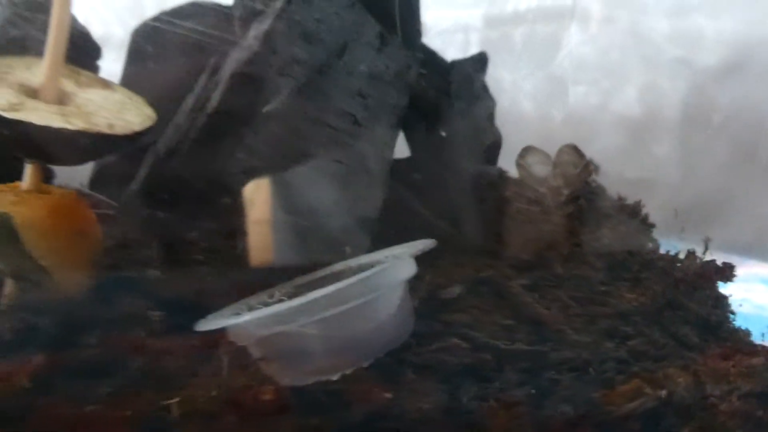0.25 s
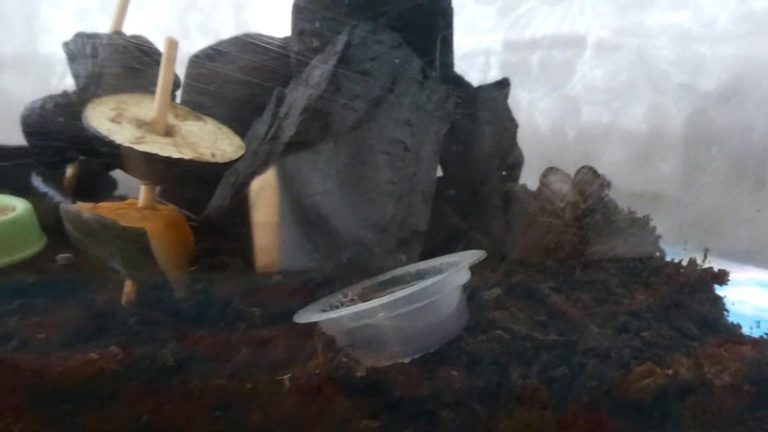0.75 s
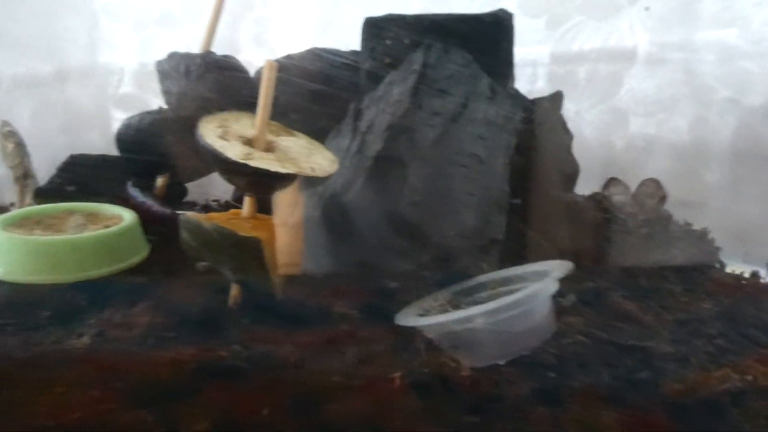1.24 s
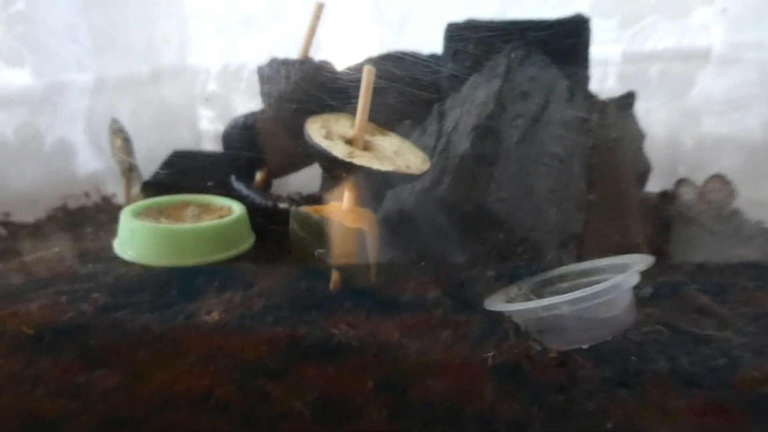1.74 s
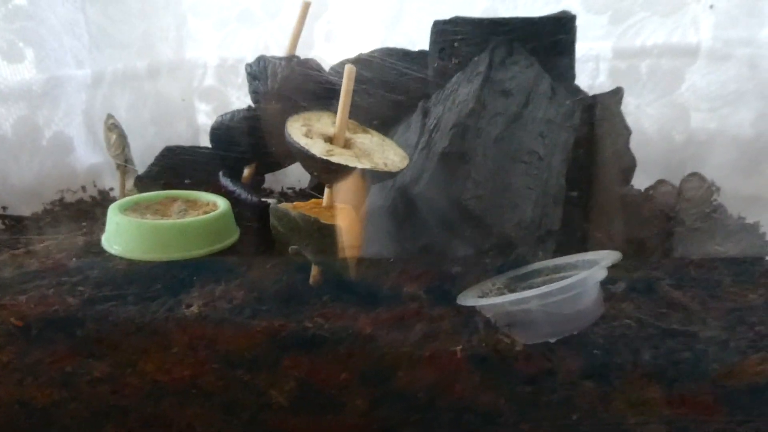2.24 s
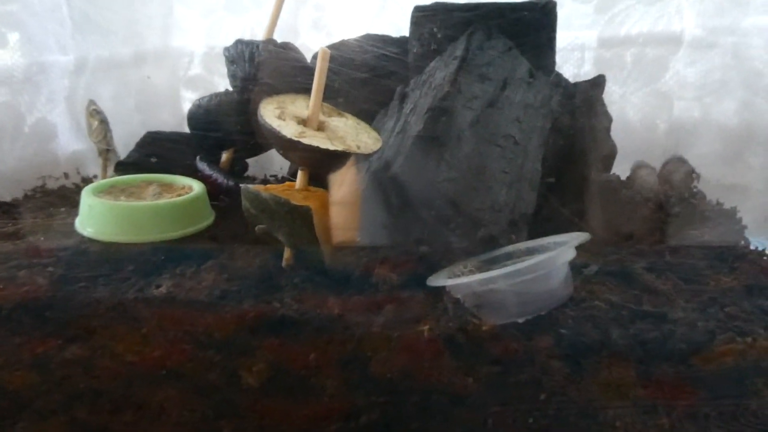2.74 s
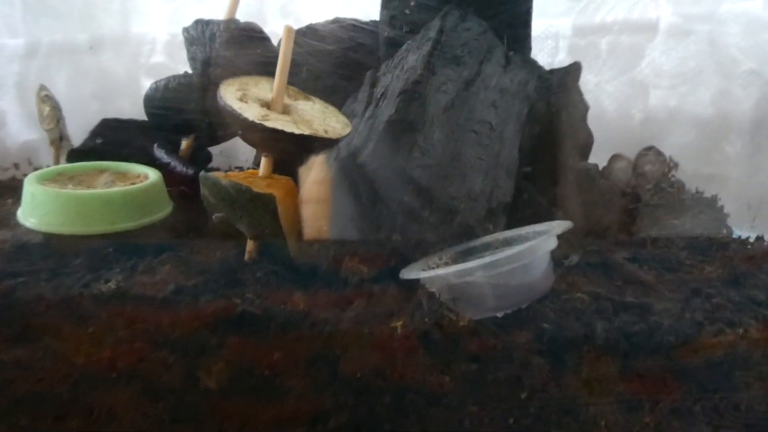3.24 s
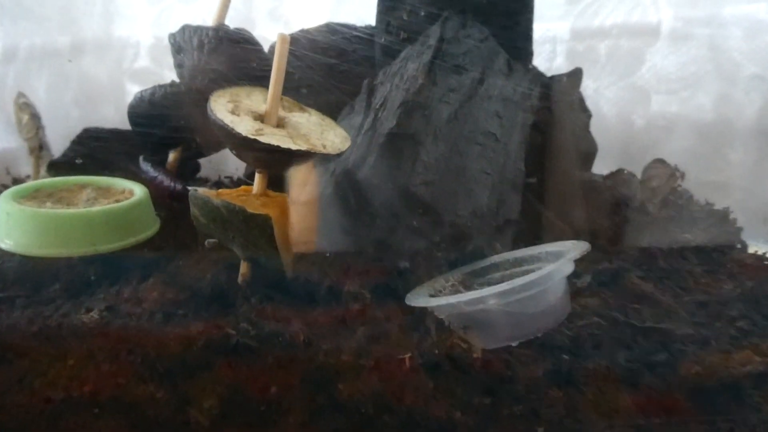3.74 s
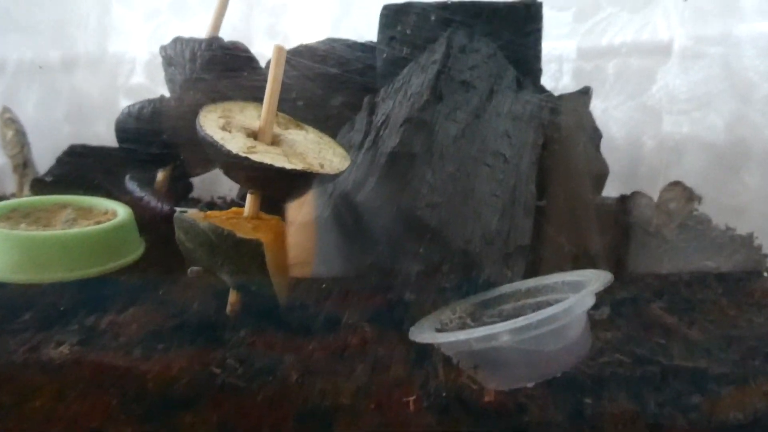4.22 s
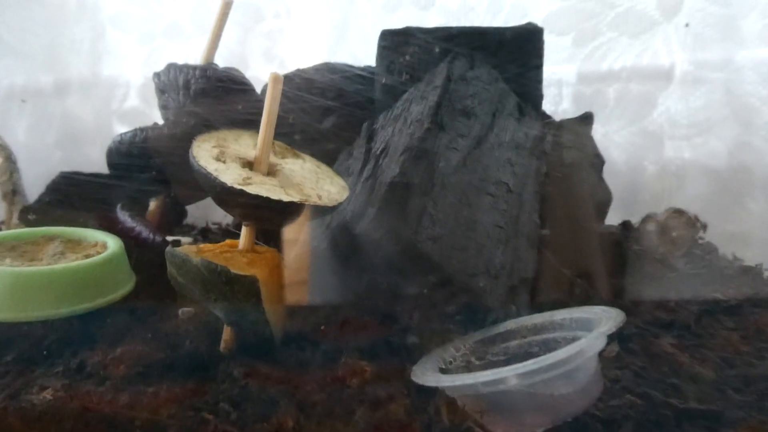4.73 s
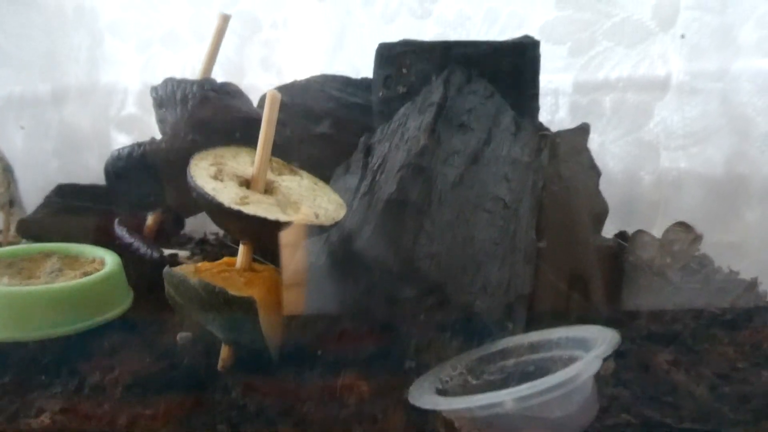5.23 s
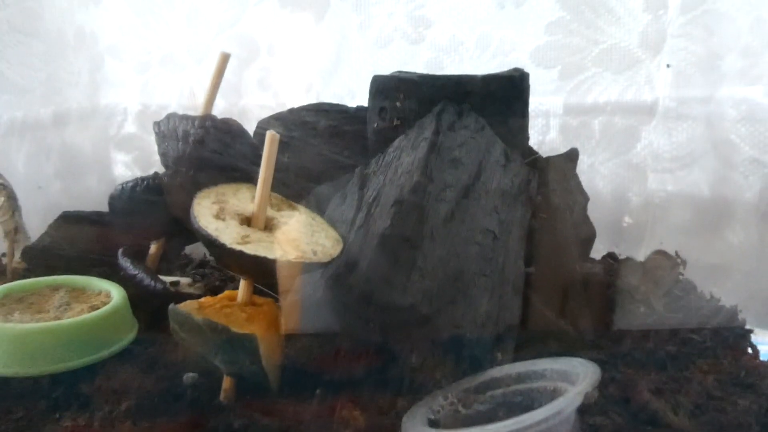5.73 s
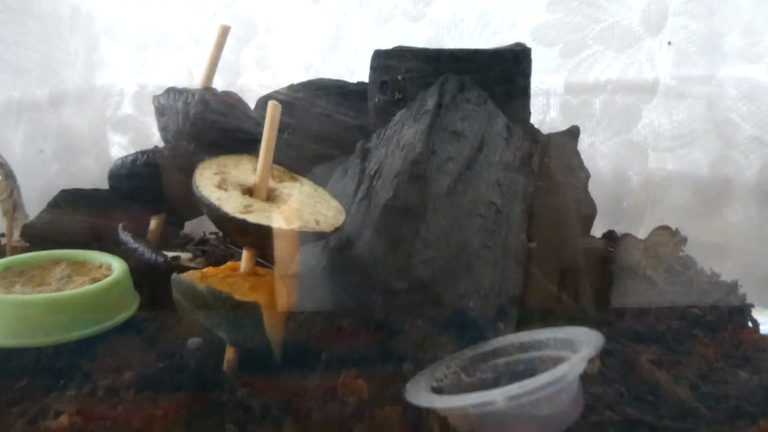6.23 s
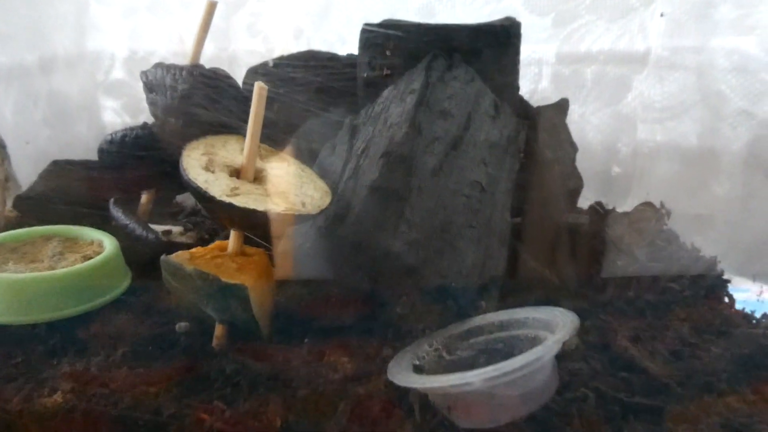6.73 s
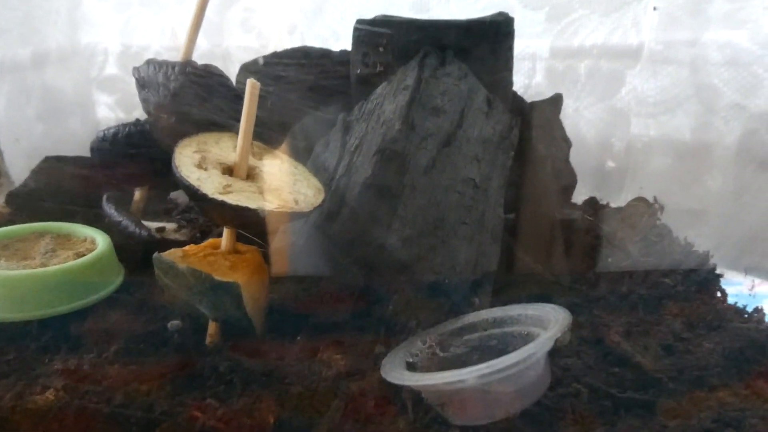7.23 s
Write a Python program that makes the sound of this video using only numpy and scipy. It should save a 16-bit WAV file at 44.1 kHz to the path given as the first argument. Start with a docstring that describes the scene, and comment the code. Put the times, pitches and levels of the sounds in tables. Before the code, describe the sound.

In a quiet room, a bell cricket in a glass tank rasps drily, then sings six high, silvery trilling phrases before a last one trails off.

```python
"""Bell cricket in a glass tank

Quiet room, two microphones close to the tank. After a dry rasp the cricket sings six phrases near 4.9 kHz,
some fifty wing strokes a second: scratchy lead-in, crest of long strokes, even trill, fade. A last lead-in
trails off and stops. File teeth drive tones with overtones, filtered noise makes the scrape, and decaying
reflections add the tank. Behind it: room air from coloured noise, and wavering mains and appliance hum."""
import sys
import numpy as np
from scipy import signal
from scipy.fft import rfft, irfft, next_fast_len
from scipy.io import wavfile
from scipy.ndimage import uniform_filter1d

SR = 44100
rng = np.random.default_rng(int(sys.argv[2]) if len(sys.argv) > 2 else 0)


def pcm_store(signal):
    """Save signal as 16-bit PCM."""
    levels = np.round(np.clip(np.atleast_2d(signal), -1, 1) * 32767)
    wavfile.write(sys.argv[1], SR, levels.astype(np.int16).T)


N = 329413
T = np.arange(N) / SR

# Levels of song, scrape and catches are relative: each source has its own trim where it is mixed.
# phrases: (start [s], crest [s], crest length [s], fade [s], lead-in level [dB], crest level [dB],
# trill level [dB], trough level [dB], pitch sag in the trough [Hz], lead-in octave level [dB],
# trill octave level [dB], trill rasp level [dB])
PHRASES = [(1.518, 1.586, 0.037, 1.84, -37.5, -16.5, -22.5, -41, 115, -59.5, -54, -50.5),
           (2.2, 2.287, 0.033, 2.57, -31, -16, -21.5, -36, 75, -55, -53, -50),
           (2.839, 2.997, .068, 3.35, -33, -19, -22.5, -31, 35, -45, -48, -46.5),
           (3.563, 3.814, 0.073, 4.17, -33.5, -17.5, -19, -24.5, -0.5, -45, -47.5, -48.5),
           (4.267, 4.704, .111, 5.08, -29, -16.5, -19.5, -22, 0, -42.5, -49.5, -49.5),
           (5.108, 5.574, 0.08, 5.93, -29.5, -16.5, -19, -29, 16.5, -43, -51, -48)]
# the dry rasp before the first phrase: (time [s], ring level [dB], pitch [Hz], octave level [dB],
# third harmonic level [dB], rasp level [dB])
WARM_UP = [(1.04, -72, 4930, -85, -83, -58), (1.12, -66, 4930, -83, -80, -57.5),
           (1.22, -64.5, 4850, -80, -76, -52.5), (1.27, -54, 4755, -84, -71, -54),
           (1.51, -49.5, 4740, -75.5, -74, -52.5)]
# the last lead-in, which dies away without a crest: (time [s], ring level [dB], pitch [Hz],
# octave level [dB], third harmonic level [dB], rasp level [dB])
TRAIL_OFF = [(6.13, -26, 4945, -43.5, -48, -45.5), (6.24, -32, 4900, -43, -53, -47),
             (6.29, -34.5, 4915, -44, -50, -48), (6.5, -36.5, 4914, -42.5, -57, -50.5),
             (6.78, -44.5, 4902, -52.5, -65, -57)]
# how the wing radiates its overtones: (frequency [Hz], level [dB])
RADIATION = [(9000, -9), (9600, -1), (9900, -1), (10250, 0), (10800, -14), (14200, -7.5), (14700, -3.5),
             (14950, 2.5), (15400, -4)]
# resonances through which the wings radiate the scrape: (frequency [Hz], width [Hz], level [dB])
WING_RESONANCES = [(3025, 540, -18.5), (3977, 600, -11), (4823, 320, -0.5), (5553, 520, -2.5),
                   (6635, 750, -5), (7570, 1500, -10), (9700, 1200, -6.5), (11650, 1300, -14.5),
                   (12750, 1000, -13), (15000, 1100, -12.5)]
# narrow dips in the scrape, where reflections from the glass walls cancel: (frequency [Hz], width [Hz], level
# [dB])
DIPS = [(3240, 110, -4.5), (4400, 117, -1.5), (6200, 130, -1), (8300, 250, -4.5)]
# scratches, where the scraper slips and the rasp flares: (time [s], length [s], added level [dB])
SCRATCHES = [(1.825, .012, 4), (2.048, 0.019, 2), (2.412, .015, 6.5), (2.877, 0.021, 1.5),
             (3.209, 0.031, 5.5), (3.586, 0.039, 4), (5.705, .02, 4.5), (6.169, .025, 3.5)]
# the scraper catching on the file as the song starts: (time [s], peak level [dB])
CATCHES = [(1.2575, -32.5), (1.2837, -33), (1.3176, -33), (1.333, -34), (1.4104, -41), (1.427, -33),
           (1.4813, -37), (1.517, -44), (1.5353, -28)]
# spectrum shape of room air common to both microphones: (frequency [Hz], level [dB per Hz])
AIR_MID = [(25, -29.5), (60, -20.5), (120, -10), (250, -6.5), (480, -7), (700, -12), (1600, -14),
           (3200, -19), (5500, -21.5), (7800, -24.5), (8650, -17.5), (9500, -25), (15500, -26)]
# spectrum shape of room air opposed between them: (frequency [Hz], level [dB per Hz])
AIR_SIDE = [(25, -38.5), (60, -14), (110, -7.5), (240, -0.5), (500, -2.5), (1000, -10), (2400, -18.5),
            (4400, -28.5), (8000, -32.5), (15500, -30)]
# uneven level of the low background noise: (time [s], level [dB])
LOW_NOISE_LEVEL = [(0, 0.5), (.8, -1.5), (1.3, 1), (2.6, 2), (3.6, 3.5), (4.6, 4), (4.9, 1.5), (5.3, 5),
                   (5.8, 1), (6.2, 4), (6.7, 2.5), (7.1, -1), (7.47, -.5)]
# mains hum and appliance tones: (frequency [Hz], left level [dB rms], right channel [factor on the left])
HUM = [(92, -79.5, 1.6), (119.5, -70.5, 1.64), (246, -74, 0.3), (364, -80.5, .9), (482, -69, 0.78),
       (837, -79, 0.75)]

SONG_START_S, SONG_END_S = 1.043, 6.78
REST_START_S, REST_END_S = 5.677, 5.695  # the wings rest for one stroke
STROKE_S, SLOWING_S, LONG_STROKE_S = 0.0178, 0.00054, 0.037  # slowing is added with each phrase
GRIP_S, SWELL_S = 0.02496, 0.0856  # lead-in attack, rise towards the crest
SETTLE_S = 0.01003  # half the step onto and off the crest
TROUGH_SHARE = 0.7  # part of the fade spent falling
LEAD_IN_DROOP_DB_PER_S, TRILL_DROOP_DB = 18.5, 1.5
LEAD_IN_HZ, CREST_HZ, TRILL_HZ = 4898, 4936, 4950
OCTAVE_CREST_DB, OCTAVE_TROUGH_DB = -49, -52
THIRD_LEAD_IN_DB, THIRD_CREST_DB, THIRD_TRILL_DB, THIRD_TROUGH_DB = -52.5, -50.5, -51.5, -62
RASP_CREST_DB, RASP_TROUGH_DB = -49.5, -51
RASP_LEAD_IN_DB, RASP_PER_OCTAVE = -26, 0.45  # offset, and rasp dB per dB of the lead-in's octave


def cricket(glide_hz=20, loose_glide_hz=50, arch_hz=8, loose_arch_hz=80, jitter_hz=14, loose_jitter_hz=18,
            rough=0.053, loose_rough=0.2, flat_rough=0.48, skid_share=0.55, skid_width=0.3,
            opening_db=-15, loose_opening_db=6.0, opening_drop_hz=120, rasp_db=-1.5):
    """File teeth drive the wing resonance: pure when they lock to it, unsteady and raspy when they slip."""
    ring_db, pitch, octave_db, third_db, scrape_db = song()
    loose = np.clip((-21.5 - ring_db) / 8, 0, 1)  # soft strokes lock poorly
    closing, opening, place = strokes(loose)
    voiced = np.clip((ring_db + 68) / 12, 0, 1)  # the very softest only scrape
    flat = np.clip((4900 - pitch) / 150, 0, 1)  # teeth too slow for the wing: the tone breaks up

    # the scraper speeds up and then slows along the file, so each stroke is a falling arch of pitch
    glide = (glide_hz + loose_glide_hz * loose) * place
    arch = (arch_hz + loose_arch_hz * loose) * (place ** 2 - 0.2)
    jitter = (jitter_hz + loose_jitter_hz * loose) * wander(200)
    phase = 2 * np.pi * np.cumsum(pitch - glide - arch + jitter) / SR

    # near its fastest a loose stroke outruns the wing, and the ring dips
    skid = skid_share * loose * np.exp(-((place - 0.3 * wander(30)) / skid_width) ** 2)
    roughness = rough + loose_rough * loose ** 2 + flat_rough * flat
    ring = closing * (1 - skid) * (1 + 0.25 * loose) * partial(phase, roughness, width_hz=114)

    # on the way back the scraper brushes the file: a weaker, rougher tone, lower when loose
    back_phase = 2 * np.pi * np.cumsum(pitch - opening_drop_hz * loose) / SR
    back_gain = gain_of(opening_db + loose_opening_db * loose)
    ring += opening * back_gain * partial(back_phase, 0.5, width_hz=50)
    ring = ring.real * voiced * gain_of(ring_db - 0.2)

    # overtones are stronger early in the stroke, as the scraper bites
    bite = voiced * closing * (1 - 0.25 * place)
    grainy = 0.1 + 0.5 * np.clip((-46 - octave_db) / 9, 0, 1)  # a weak octave is grainier
    octave = radiated(gain_of(octave_db + 1.0) * bite * partial(2 * phase, grainy, width_hz=280))
    third = radiated(gain_of(third_db + 0.8) * bite * partial(3 * phase, 0.4, width_hz=200))

    # the shorter the wave, the further out of step the two microphones hear it
    ports = np.array([[-1], [1]])
    overtones = (octave * np.exp(0.2j * ports) + third * np.exp(0.6j * ports)).real

    softness = np.clip((-46 - ring_db) / 12, 0, 1)
    scrape = gain_of(scrape_db + rasp_db + flare_db()) * rasp(closing + 1.347 * opening, softness)
    ring_reflected = ring * gain_of(-13.5 + 8.9 * loose)
    reflected = ring_reflected + gain_of(-7) * octave.real + gain_of(-1.5) * third.real
    return ring * gain_of(0.63 * ports) + overtones + catches() + scrape + tank(reflected)


def song():
    """Stages of each phrase, joined in time: ring dB, pitch Hz, octave dB, third harmonic dB and rasp dB."""
    stages = list(WARM_UP)
    ends = [row[0] for row in PHRASES[1:]] + [TRAIL_OFF[0][0] - GRIP_S]
    for phrase, end in zip(PHRASES, ends):
        start, crest, length, fade, lead_db, crest_db, trill_db, trough_db = phrase[:8]
        sag_hz, lead_octave_db, octave_db, rasp_db = phrase[8:]
        grip = start + GRIP_S
        swell = max(crest - SWELL_S, grip)
        grip_db = lead_db + LEAD_IN_DROOP_DB_PER_S * (swell - grip)
        # a lead-in rasps more the stronger its octave is
        scratch_db = RASP_LEAD_IN_DB + RASP_PER_OCTAVE * lead_octave_db
        top = (crest_db, CREST_HZ, OCTAVE_CREST_DB, THIRD_CREST_DB, RASP_CREST_DB)
        trough = (trough_db, LEAD_IN_HZ - sag_hz, OCTAVE_TROUGH_DB, THIRD_TROUGH_DB, RASP_TROUGH_DB)
        trill = (octave_db, THIRD_TRILL_DB, rasp_db)
        stages += [
            (grip, grip_db, TRILL_HZ, lead_octave_db, THIRD_LEAD_IN_DB, scratch_db),
            (swell, lead_db, LEAD_IN_HZ, lead_octave_db, THIRD_LEAD_IN_DB, scratch_db),
            (crest - SETTLE_S, trill_db, CREST_HZ, lead_octave_db, THIRD_CREST_DB, scratch_db),
            (crest + SETTLE_S, *top),
            (crest + length - SETTLE_S, *top),
            (crest + length + SETTLE_S, trill_db + TRILL_DROOP_DB / 2, CREST_HZ, *trill),
            (fade, trill_db - TRILL_DROOP_DB / 2, TRILL_HZ, *trill),
            (fade + TROUGH_SHARE * (end - fade), *trough),
            (end, *trough)]
    times, *columns = np.transpose(stages + list(TRAIL_OFF))
    times = np.maximum.accumulate(times)
    return [np.interp(T, times, column) for column in columns]


def strokes(loose, opening_s=0.0062, shape=0.57, uneven_db=1.0, stumble_s=0.0017):
    """Wing motion: pressure on the file while closing and reopening, and place along the file (-1 to 1)."""
    edges = stroke_edges()
    early, strength = rng.standard_normal((2, len(edges)))
    slack = np.interp(edges, T, loose)  # loose strokes are uneven in time
    edges = np.sort(edges + stumble_s * slack * early)
    resting = (T > REST_START_S) & (T < REST_END_S)
    singing = (T > SONG_START_S) & (T < SONG_END_S) & ~resting
    k = np.clip(np.searchsorted(edges, T) - 1, 0, len(edges) - 2)
    half = np.diff(edges)[k] / 2
    middle = (edges[k] + edges[k + 1]) / 2

    # the wings reopen in a fixed time, so a slow stroke is a longer closing
    closing_half = np.maximum(half - opening_s / 2, 1e-3)
    place = np.clip((T - middle) / closing_half, -1, 1)
    closing = abs(np.cos(np.pi / 2 * place)) ** shape * gain_of(uneven_db * strength)[k]
    reopened = np.clip((abs(T - middle) - closing_half) / (opening_s / 2), 0, 1)
    opening = np.sin(np.pi / 2 * reopened)

    # two short averages round the stroke edges
    both = np.array([closing, opening]) * singing
    both = abs(uniform_filter1d(uniform_filter1d(both, size=36), size=28))
    closing, opening = both / np.sqrt(np.mean(both[0, singing] ** 2))
    return closing, opening, place


def stroke_edges():
    """Start of every wing stroke: long on each crest, then an even beat a little slower in each phrase."""
    edges = [np.arange(SONG_START_S, PHRASES[0][1] - STROKE_S / 2, STROKE_S)]
    next_crests = [row[1] for row in PHRASES[1:]] + [SONG_END_S]
    for k, (phrase, until) in enumerate(zip(PHRASES, next_crests)):
        crest, length = phrase[1:3]
        beat = STROKE_S + k * SLOWING_S
        long_count = max(round(length / LONG_STROKE_S), 1)
        edges.append(np.linspace(crest, crest + length, long_count, endpoint=False))
        edges.append(np.arange(crest + length, until - 0.8 * beat, beat))
    return np.concatenate(edges + [[SONG_END_S]])


def partial(phase, roughness, width_hz):
    """One complex tone of the wing, real part at rms one; uneven teeth spread a skirt around it."""
    grain = 1 + roughness * (wander(width_hz) + 1j * wander(width_hz))
    return np.sqrt(2 / (1 + 2 * roughness ** 2)) * grain * np.exp(1j * phase)


def radiated(tone):
    """An overtone carries best where it meets a resonance of the wing."""
    hz, db = np.transpose(RADIATION)
    size = next_fast_len(N)
    f = np.fft.fftfreq(size, 1 / SR)
    return np.fft.ifft(np.fft.fft(tone, size) * gain_of(np.interp(f, hz, db)))[:N]


def rasp(pressure, softness, clump_db=4.5, burst_db=2.0, linger=0.266, linger_s=0.014,
         apart_share=0.25, broad_db=-13, soft_dull_db=-6):
    """Dry scrape of the file: each wing resonance takes its own clumps of noise under the strokes."""
    keep = np.exp(-1 / (linger_s * SR))
    force = pressure * gain_of(burst_db * wander(130)) ** 2
    out = np.zeros((2, N))
    broad = (5600, 22000, broad_db)
    for hz, width, db in list(WING_RESONANCES) + [broad]:
        # a soft scrape loses level away from 5600 Hz
        dulling_db = soft_dull_db * softness * abs(np.log2(hz / 5600))
        power = force * gain_of(clump_db * wander(180) + dulling_db) ** 2
        power += linger * signal.lfilter([1 - keep], [1, -keep], power)  # it lingers briefly in the tank
        noise = np.sqrt(power) * rng.standard_normal((2, N))
        b, a = signal.iirpeak(hz, hz / width, fs=SR)
        out += gain_of(db) * evened(signal.lfilter(b, a, signal.lfilter(b, a, noise)))

    size = next_fast_len(N)
    f = np.fft.rfftfreq(size, 1 / SR)
    dips = gain_of(sum(db * np.exp(-((f - hz) / width) ** 2) for hz, width, db in DIPS))
    common, apart = irfft(rfft(out, size) * dips, size)[:, :N]
    return np.array([common + apart_share * apart, common - apart_share * apart])


def flare_db():
    """Rise of the rasp in decibels during each scratch, as the scraper slips."""
    return sum(db * np.exp(-(2 * (T - s) / length) ** 2) for s, length, db in SCRATCHES)


def catches(hz=4720, rise_s=0.0012, trim_db=-3):
    """As the song starts, the scraper catches a few teeth and the wing rings for an instant."""
    out = np.zeros(N)
    t = np.arange(SR // 50) / SR
    ping = t / rise_s * np.exp(1 - t / rise_s) * np.sin(2 * np.pi * hz * t)
    for s, peak_db in CATCHES:
        out[round(s * SR):][:len(t)] += gain_of(peak_db + trim_db) * ping
    return out


def tank(x, mode_hz=4927, mode_width_hz=10, mode_db=5.0, t60_s=0.22):
    """Dense reflections between the glass walls, and one standing wave that the song keeps ringing."""
    t = np.arange(SR // 3) / SR
    decay = gain_of(-60 * t / t60_s) * (t > 0.002)
    common, apart = rng.standard_normal((2, len(t))) * decay
    tails = np.array([common + apart / 2, common - apart / 2])
    damping = np.pi * mode_width_hz
    standing = 2 * damping / SR * np.exp(-damping * t) * np.sin(2 * np.pi * mode_hz * t)
    response = tails / np.linalg.norm(tails[0]) + gain_of(mode_db) * standing
    return signal.oaconvolve(x[None], response, axes=1)[:, :N]


def room(mid_db=-60, side_db=-54):
    """Soft air noise whose low part varies in level, and a wavering hum."""
    mid = gain_of(mid_db) * coloured(rng.standard_normal(N), AIR_MID)
    side = gain_of(side_db) * coloured(rng.standard_normal(N), AIR_SIDE)
    air = np.array([mid + side, mid - side])
    low = signal.sosfilt(signal.butter(1, 2500, fs=SR, output="sos"), air)
    low_gain = gain_of(np.interp(T, *np.transpose(LOW_NOISE_LEVEL)))
    air = air + low * (low_gain - 1)
    for hz, db, right in HUM:
        level = np.sqrt(2) * gain_of(db + 0.71 * wander(2.0))
        tone = level * np.sin(2 * np.pi * hz * T + 0.34 * wander(1.69))
        air = air + np.array([[1], [right]]) * tone
    return air


def coloured(x, points):
    """Gives x a spectrum drawn through (frequency [Hz], level [dB]) points on a log axis; rms one."""
    hz, db = np.transpose(points)
    size = next_fast_len(N)
    f = np.fft.rfftfreq(size, 1 / SR)
    shape = gain_of(np.interp(np.log(f + 1), np.log(hz + 1), db))
    return evened(irfft(rfft(x, size) * shape, size)[:N])


def wander(hz):
    """Smooth random motion of rms one: noise that falls off above about hz."""
    size = next_fast_len(N)
    f = np.fft.rfftfreq(size, 1 / SR)
    return evened(irfft(rfft(rng.standard_normal(size)) / (1 + (f / hz) ** 2), size)[:N])


def evened(x):
    """Scales to an rms of one."""
    return x / np.sqrt(np.mean(abs(x) ** 2) + 1e-20)


def gain_of(db):
    """Decibels to amplitude."""
    return 10 ** (np.asarray(db) / 20)


def scene():
    """The cricket in its tank, close to the microphones, with the quiet room behind."""
    return cricket() + room()


def record(dry, edge_hz=15750):
    """The recorder's band limit: a steep low-pass."""
    low_pass = signal.firwin(511, edge_hz, window=("kaiser", 9), fs=SR)
    return signal.oaconvolve(dry, low_pass[None], "same")


dry = scene()
out = record(dry)
pcm_store(out)
```